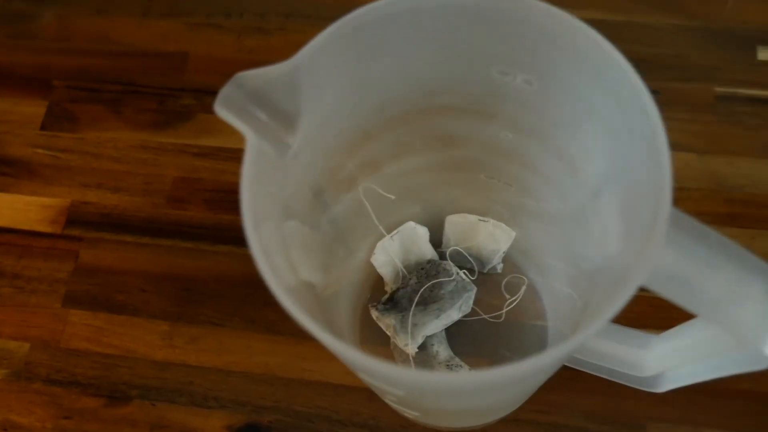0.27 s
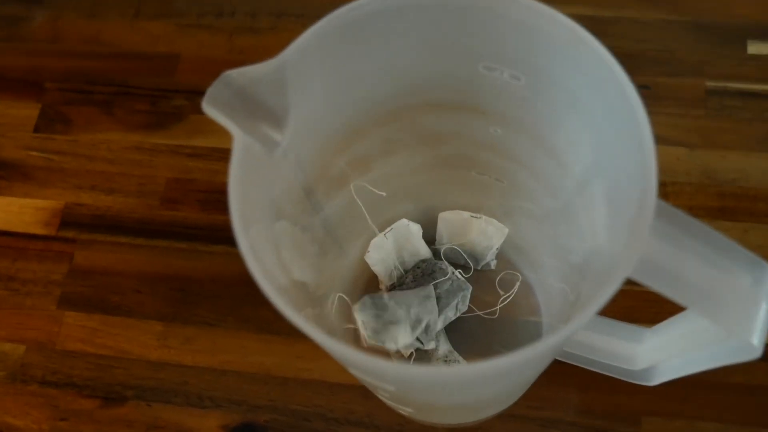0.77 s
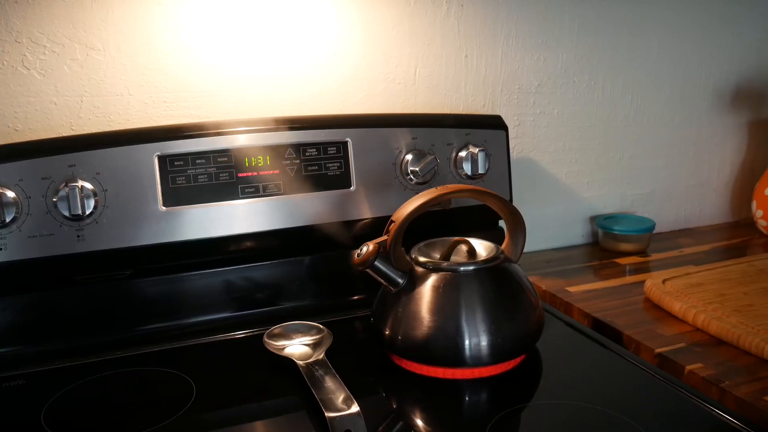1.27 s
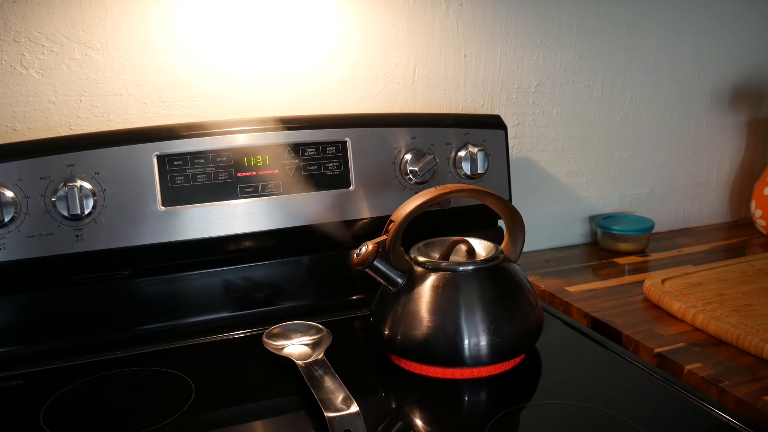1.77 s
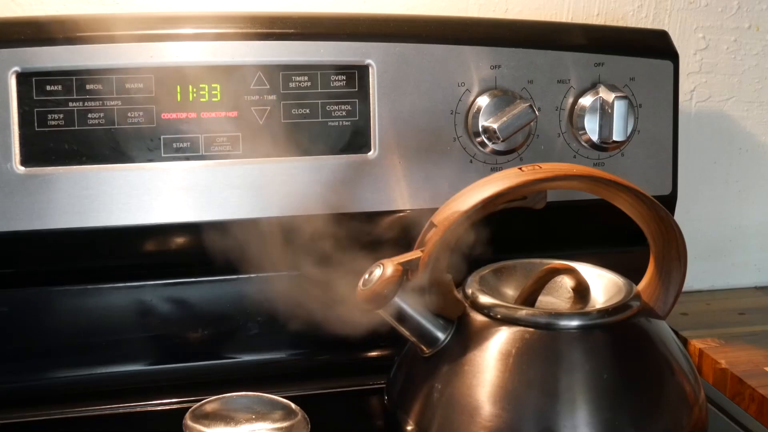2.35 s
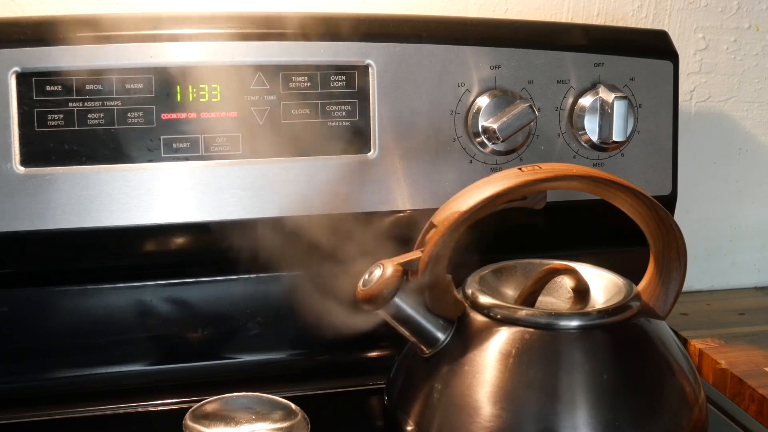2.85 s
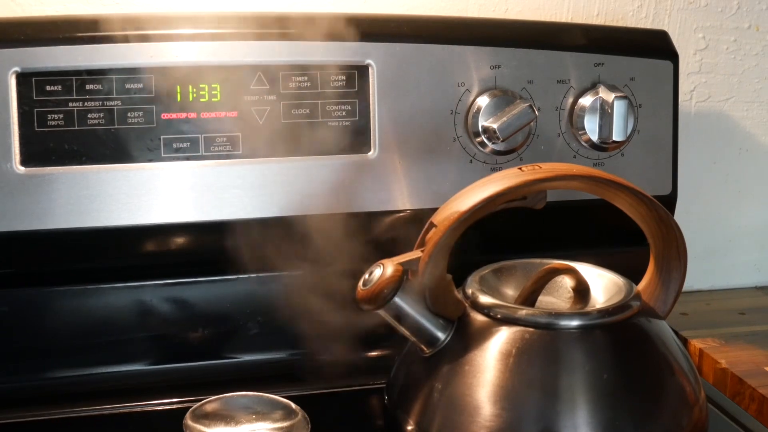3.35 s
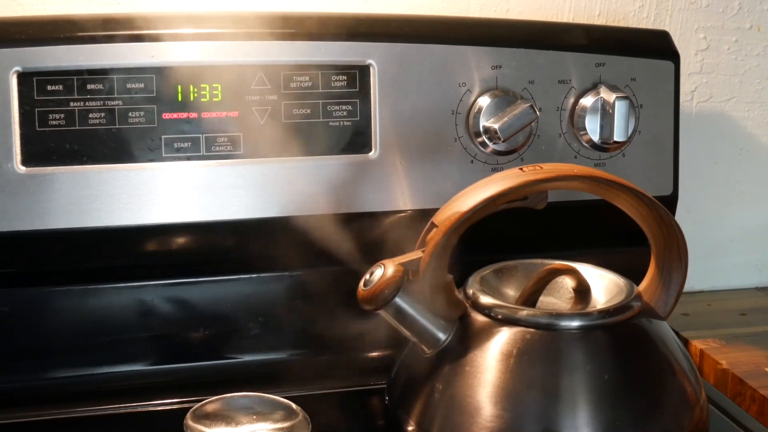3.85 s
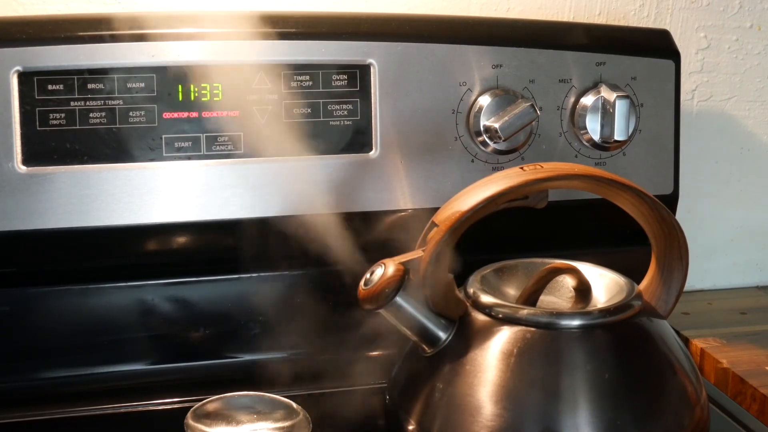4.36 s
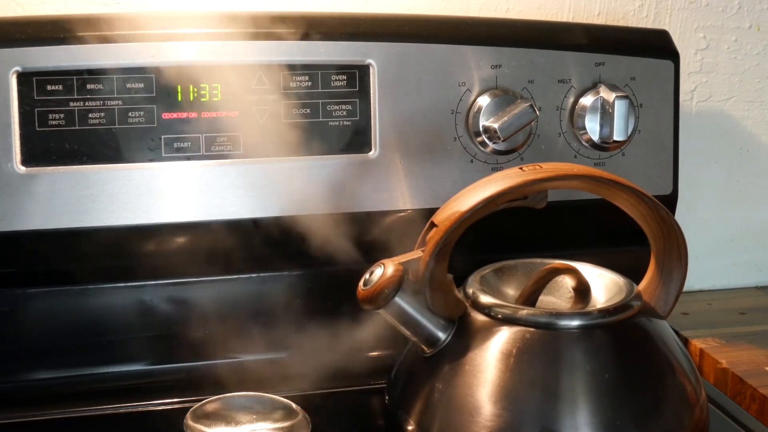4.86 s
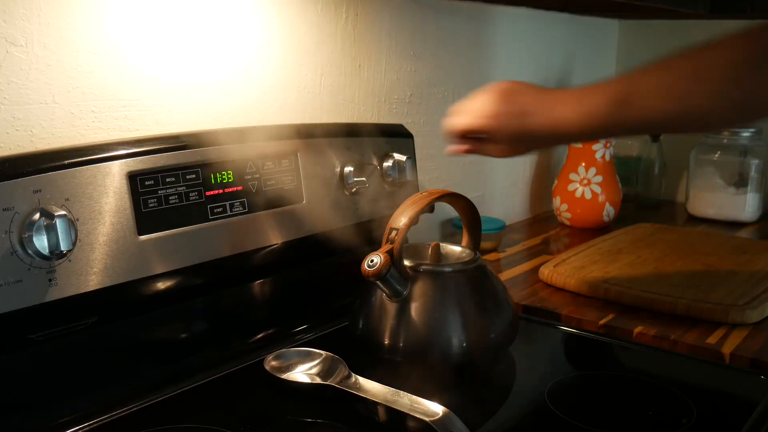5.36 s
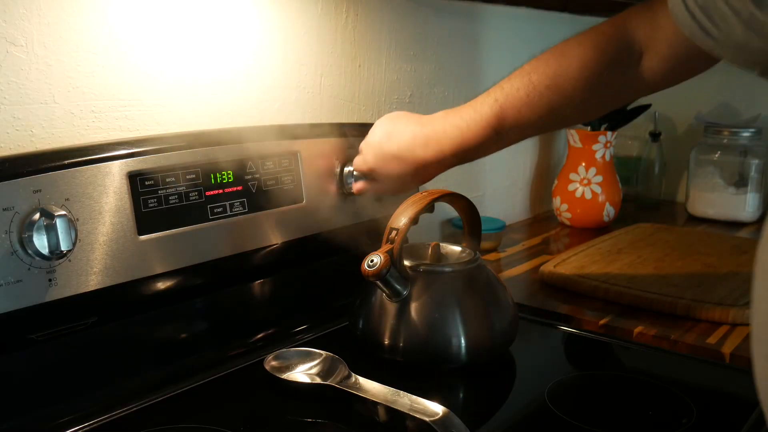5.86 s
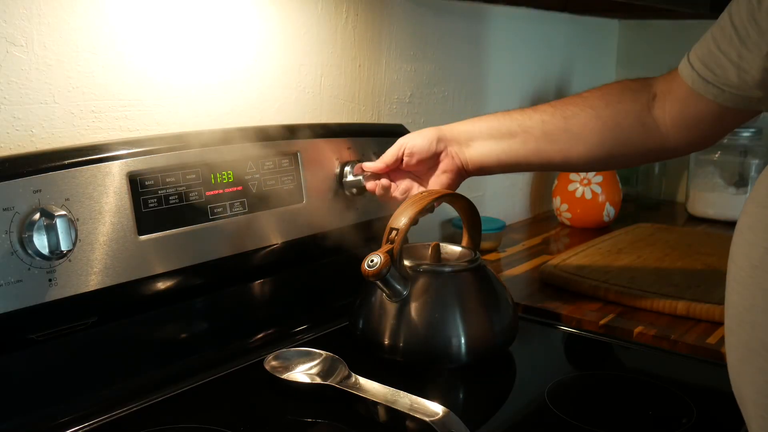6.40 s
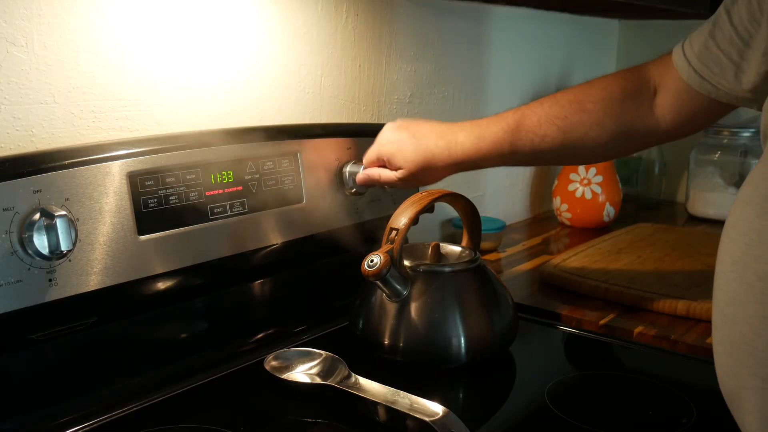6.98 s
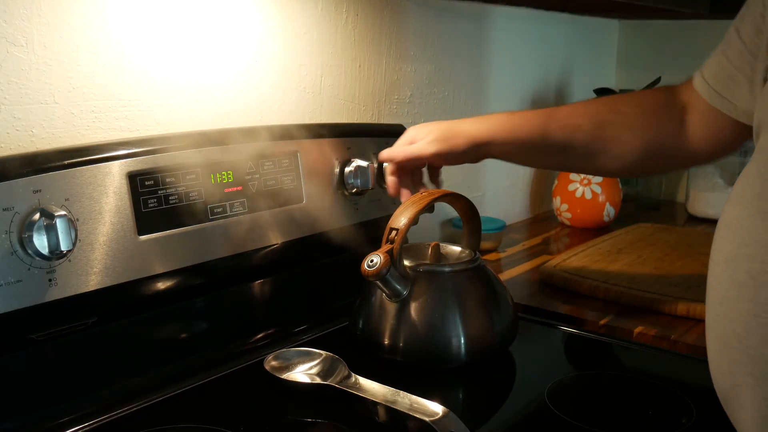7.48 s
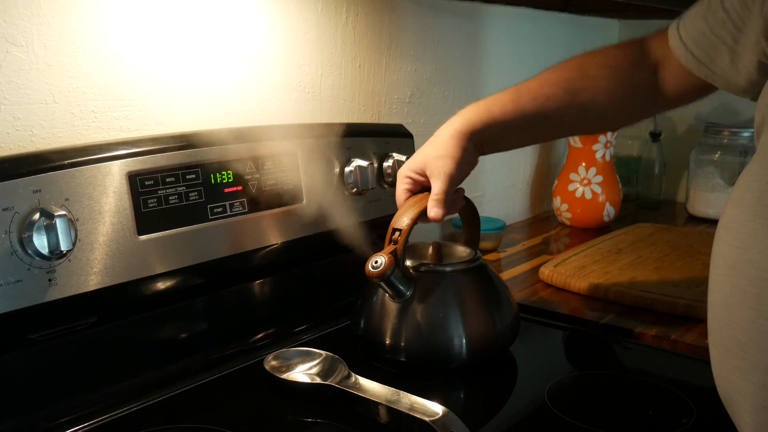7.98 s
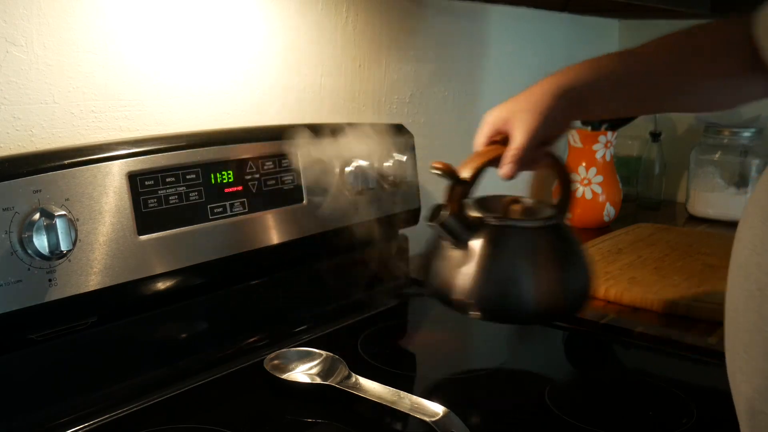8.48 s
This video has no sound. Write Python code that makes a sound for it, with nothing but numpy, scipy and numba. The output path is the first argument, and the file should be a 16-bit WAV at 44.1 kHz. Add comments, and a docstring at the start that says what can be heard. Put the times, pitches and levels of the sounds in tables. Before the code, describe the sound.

Soft sizzle and a tea bag's pat, brief silence, then a hoarse full-steam kettle whistle that drops lower and warbles, ending with knob clicks and a metallic cap snap.

```python
"""Whistling kettle

A tea bag pats into a plastic jug while a kettle heats; after a short silence the kettle whistles at full steam, hoarse,
then the scene skips ahead to a lower, warbling whistle. It is two unsteady spout tones of sines and resonant noise,
with hiss and squeaks; filtered noise gives the sizzle and boil, over a hum. The stove knob and switch click as
decaying modes; the whistle rises and dies as the spout cap is lifted, and the cap snaps open."""
import sys
import numpy as np
from scipy import signal
from scipy.fft import rfft, irfft, next_fast_len
from scipy.io import wavfile
from numba import njit

SR = 44100
rng = np.random.default_rng(int(sys.argv[2]) if len(sys.argv) > 2 else 0)


def persist_wave(psi):
    """Save psi, clipped to +-1, as 16-bit WAV."""
    counts = np.round(np.clip(psi, -1, 1) * 32767).astype(np.int16)
    wavfile.write(sys.argv[1], SR, np.atleast_2d(counts).T)


N = 385434
TIME = np.arange(N) / SR
SHORT = TIME[:SR // 2]  # time axis of brief sounds
HEAT_END_S, BOIL_START_S, SKIP_S, GRIP_S, CAP_LIFT_S = .897, 1.025, 2.392, 7.69, 8.045
OVERBLOWN_HZ = 5830  # the next spout resonance above the upper tone


# upper spout tone, which follows the steam pressure: (time [s], pitch [Hz])
FULL_STEAM_PITCH = [(1.03, 4830), (1.25, 5100), (1.55, 5292), (2.39, 5331)]
SLACK_STEAM_PITCH = [(2.392, 4510), (3.1, 4440), (4.33, 4453), (4.75, 4608), (5.049, 4750), (5.8, 4645),
                     (7.25, 4645), (7.689, 4720)]
# two swells as the kettle is gripped and tipped, then a drop as the cap opens: (time [s], pitch [Hz])
TIPPED_PITCH = [(7.72, 5080), (7.8, 4817), (7.865, 5410), (7.952, 5536), (8.005, 5493), (8.037, 4970)]
# lower tone and hiss: (time [s], relative level of the lower tone [dB], relative level of the hiss [dB])
STEAM_LEVELS = [(1.03, -27, -38), (1.75, -30, -37.3), (2.38, -28, -39.5), (2.4, -34.5, -39),
                (4.65, -35.5, -39.5), (5.0, -33, -37), (7.65, -31, -38.5), (7.92, -38.5, -37),
                (8.02, -32.5, -35.5)]
# turbulent hiss: (frequency [Hz], relative spectrum level [dB])
HISS_SPECTRUM = [(40, -45), (300, -10), (800, -12), (1200, -13), (1700, -13.5), (2100, -5.5), (3100, -6),
                 (4100, -16.5), (4700, 1), (6000, 2), (7100, -2), (7900, -10.5), (10500, -10), (15000, -29)]
# the upper tone cannot sink below the spout's own resonance: (frequency [Hz], relative gain [dB])
SPOUT_EDGE_GAIN = [(4000, -12), (4350, 2)]
# the upper tone stays faint until its pitch passes a threshold, then grows with it up to a ceiling
THRESHOLD_HZ, REST_DB, GROWTH_DB_PER_HZ, CEILING_DB = 4550, -35.2, .0217, -17.9
# the lower tone rests on its own note until the upper one pulls it along, about an octave below
LOW_REST_HZ, LOW_RATIO = 2479, .508


def whistle():
    """Jet lock-in to two spout tones; surges of boiling make both warble in pitch and throb in level."""
    high_hz, = curves(FULL_STEAM_PITCH + SLACK_STEAM_PITCH + TIPPED_PITCH)
    high_db = np.clip(REST_DB + GROWTH_DB_PER_HZ * (high_hz - THRESHOLD_HZ), REST_DB, CEILING_DB)
    low_hz = np.maximum(LOW_REST_HZ, LOW_RATIO * high_hz)
    low_db, hiss_db = curves(STEAM_LEVELS)
    surge = throb(hz=27.5, width_hz=32.3)
    flutter = throb(hz=71.8, width_hz=113)
    # a harder jet (drive 0 to 1) locks better and shakes faster
    drive = np.clip((high_db + 33) / 11, 0, 1)

    slow_shake = (.0135 - .0049 * drive) * surge
    fast_shake = (.0072 + .0093 * drive) * flutter
    jitter = (.011 + .003 * drive) * walk(520)
    upper_hz = high_hz * (1 + slow_shake + fast_shake + jitter)
    tone = unit(sine(upper_hz) * undb(1.06 * walk(260)))
    breath = undb(-6.5 - 5 * drive) * blown(upper_hz, width_hz=310)
    upper = unit(colour(tone + breath, SPOUT_EDGE_GAIN))
    octave = undb(-11.5 - 11 * drive) * blown((1.95 + .045 * drive) * upper_hz, width_hz=170)

    # each surge lifts the lower tone's pitch, and it sounds in short chirps
    warble_hz = low_hz * (1 + (.062 - .032 * drive) * surge + .02207 * walk(700))
    warble = np.sqrt(2) * sine(warble_hz) + undb(-3.5) * blown(warble_hz, width_hz=510)
    lower = unit(warble * undb(2.7 * throb(hz=29, width_hz=53)))
    third = undb(-11.5) * drive * blown(2.99 * low_hz, width_hz=610)
    # a hard jet also excites a resonance just above the lower tone
    rush = undb(-41) * drive * blown(1.168 * low_hz, width_hz=270)

    hiss = noise(HISS_SPECTRUM) * undb(1.1 * surge)
    # a slack jet keeps flicking up into the next resonance
    overblown = blown(OVERBLOWN_HZ * (1 + .0038 * flutter), width_hz=75)
    overblown = undb(-1) * overblown * undb(4.5 * surge) * (1 - drive)
    steam = (upper + octave) * undb(high_db)
    steam += (lower + third) * undb(low_db - .66) + rush
    steam += (hiss * undb(5.5) + overblown) * undb(hiss_db)
    return steam * fade_out(CAP_LIFT_S, length_s=.023)


# the slack jet jumps into a neighbouring resonance: (time [s], relative level [dB], pitch [Hz])
LOW_SQUEAKS = [(2.5596, -17.5, 2950), (2.7624, -23, 2766), (2.7935, -22, 2760), (2.829, -18.5, 2920),
               (3.2804, -26, 2760), (4.0836, -27, 2790), (4.5281, -21, 2900), (6.2322, -20, 2716)]
# the same in the spout's high resonance: (time [s], relative level [dB])
HIGH_SQUEAKS = [(4.0946, -21), (5.7664, -25), (5.8434, -23), (5.9203, -24), (6.1763, -22.5), (6.9107, -29),
                (7.235, -24)]


def squeaking():
    """Mode jumping: loud and faint squeaks in the resonances above each of the two tones."""
    low = [*LOW_SQUEAKS, *stray_squeaks(hz=2820, spread_hz=110, peak_db=-25.5)]
    high = [(s, db, OVERBLOWN_HZ) for s, db in HIGH_SQUEAKS]
    high += [*stray_squeaks(hz=OVERBLOWN_HZ, spread_hz=60, peak_db=-30)]
    return squeaks(low, length_s=.015, gain_db=-1) + squeaks(high, length_s=.022, gain_db=1.5)


def stray_squeaks(hz, spread_hz, peak_db):
    """Chance excitation: faint squeaks, loosely spaced over the slack whistle, as (s, dB, Hz)."""
    per_s, scatter_db = 2.6, 1.5
    chance = rng.standard_normal((64, 3))
    times = SKIP_S + (np.arange(len(chance)) + .5 + .27 * chance[:, 0]) / per_s
    levels_db = peak_db + scatter_db * chance[:, 1]
    rows = np.column_stack([times, levels_db, hz + spread_hz * chance[:, 2]])
    return rows[(times > SKIP_S) & (times < GRIP_S)]


def squeaks(table, length_s, gain_db):
    """Transient oscillation: short pure notes that swell, mostly sag in pitch, and stop."""
    out = np.zeros(N)
    age = np.minimum(SHORT / length_s, 1)
    swell = np.sin(np.pi * age ** .64)
    for (s, db, hz), bend in zip(table, rng.standard_normal(len(table))):
        note = sine(hz * (1 + .011 * (bend - .5) * (age - .5)))
        add(out, s - .003, undb(db + gain_db) * swell * note)
    return out


# the stove knob passes its detents:
# (time [s], relative level of the knob [dB], relative level of the switch behind it [dB])
KNOB_DETENTS = [(5.494, -33, -36), (5.523, -35, -30), (5.770, -26.5, -25.5), (6.543, -17.5, -17.5),
                (7.1232, -17, -3.5), (7.366, -30.5, -40)]
# modes of the hollow knob: (frequency [Hz], relative level [dB], 60 dB decay time [s])
KNOB_MODES = [(640, 0, 0.031), (750, -1, 0.056), (869, 3.5, 0.028)]
# modes of the switch and its steel panel: (frequency [Hz], relative level [dB], 60 dB decay time [s])
PANEL_MODES = [(297, -15.5, 0.14), (507, -9, 0.033), (1140, -8, 0.046), (1384, -10.5, 0.059),
               (1820, -0.5, 0.021), (1920, 0.5, 0.02), (2183, 2, 0.015), (2480, -8, 0.013),
               (3320, -23, 0.0062)]
# dense ring that lingers in that panel: (frequency [Hz], relative spectrum level [dB])
PANEL_RING = [(150, -18), (500, 2), (1900, 0), (4500, -24)]


def stove_knob():
    """Modal excitation: each detent strikes knob and panel, and rebounds once."""
    out = np.zeros(N)
    for s, knob_db, switch_db in KNOB_DETENTS:
        click = undb(knob_db) * strike(KNOB_MODES, crack_db=-7, crack_s=.055)
        click += undb(switch_db) * strike(PANEL_MODES, crack_db=-13, crack_s=.034)
        add(out, s, click)
        add(out, s, undb(switch_db - 27) * decay(.41) * noise(PANEL_RING, size=len(SHORT)))
        add(out, s + .0085, undb(-6.5) * click)
    return out


# modes of the spout cap: (frequency [Hz], relative level [dB], 60 dB decay time [s])
CAP_MODES = [(174, -25, .12), (317, -20, 0.092), (512, -17.5, 0.025), (1840, -6, 0.0057), (2460, -1, 0.009),
             (2900, -0.5, 0.0059), (3410, 2.5, 0.0084), (5700, -11, 0.0087), (6650, -15, .008)]
# the cap grazes, hits its stop and bounces: (time [s], relative level [dB])
CAP_BLOWS = [(8.1991, -22), (8.2015, -15.5), (8.2043, -0.5), (8.2060, -4), (8.215, -23)]
# dense ring of the kettle's steel shell: (frequency [Hz], relative spectrum level [dB])
SHELL_RING = [(60, -40), (500, -14), (1000, -10), (2500, -7), (3300, -5), (4300, -12), (5500, -2.5),
              (6700, -4), (8000, -7), (14000, -17)]


def spout_cap():
    """Impact and structure-borne sound: the hinge moves, the cap snaps open and the shell rings."""
    out = np.zeros(N)
    add(out, 8.155, undb(-38) * soft_blow(SHELL_RING, length_s=.045))
    for s, db in CAP_BLOWS:
        add(out, s, undb(db) * strike(CAP_MODES, crack_db=-5.5, crack_s=.015))
    # the shell takes the blow: a dense clank, then a lingering ring
    clank = undb(-19) * decay(.035) + undb(-28.5) * decay(.53)
    add(out, 8.204, clank * noise(SHELL_RING, size=len(SHORT)))
    return out


# tea bag landing in the jug: (frequency [Hz], relative spectrum level [dB])
TEA_BAG_PAT = [(120, -17), (260, -6), (330, 19.5), (450, -9), (1000, -11), (1900, -1.5), (3200, -10),
               (6000, -10), (14000, -19)]
# dull thud: (frequency [Hz], relative spectrum level [dB])
DULL_THUD = [(40, -18), (90, -6), (165, -4), (260, -19), (600, -30), (3000, -70)]


def handling():
    """Radiation efficiency: knob, cap, tea bag and one dull thud, all small and so without deep bass."""
    out = stove_knob() + spout_cap()
    add(out, .690, undb(-29.5) * soft_blow(TEA_BAG_PAT, length_s=.031))
    add(out, 4.545, undb(-32) * soft_blow(DULL_THUD, length_s=.075))
    return signal.sosfilt(signal.butter(3, 110, "high", fs=SR, output="sos"), out)


# contact noise of a hard blow: (frequency [Hz], relative spectrum level [dB])
CONTACT_CRACK = [(40, -28), (200, 4), (1000, -24), (3000, 10.5), (4500, -3), (8000, -2), (11000, -1.5),
                 (15000, -19)]


def strike(modes, crack_db, crack_s):
    """Modal superposition: decaying modes of alternating sign and a short crack of contact noise."""
    ring = np.zeros(len(SHORT))
    for k, (hz, db, t60_s) in enumerate(modes):
        ring += undb(db) * decay(t60_s) * np.sin(2 * np.pi * hz * SHORT) * (-1) ** k
    crack = undb(crack_db) * decay(crack_s) * noise(CONTACT_CRACK, size=len(SHORT))
    return ring / np.abs(ring).max() + crack


def soft_blow(points, length_s):
    """Extended contact time: a padded contact whose noise swells and fades."""
    return noise(points, size=len(SHORT)) * np.sin(np.pi * np.minimum(SHORT / length_s, 1))


# stereo width of the echo, set by hand, narrow around 7 kHz and wider above and below:
# (frequency [Hz], relative gain of the side signal [dB])
ECHO_WIDTH = [(60, -15), (1000, -0.5), (2700, -10), (4500, -16), (7000, -28), (9500, -10), (15000, -2)]


def kitchen(x, wet_db, t60_s):
    """Reverberation: direct sound plus a decaying noise tail, with separate decays for body and air."""
    tails = []
    for _ in range(2):
        chance = rng.standard_normal((2, len(SHORT)))
        body = colour(chance[0], [(5500, -.5), (11000, -10.5)]) * decay(t60_s)
        air = colour(chance[1], [(4000, -.5), (10000, 4.5)]) * decay(.15)
        tail = unit((body + air) * (SHORT > .002))
        tails.append(undb(wet_db) * tail / np.sqrt(len(SHORT)))
    mid = x + signal.fftconvolve(x, tails[0])[:N]
    side = signal.fftconvolve(x, colour(tails[1], ECHO_WIDTH))[:N]
    return np.array([mid + side, mid - side]) / np.sqrt(1 + undb(wet_db) ** 2)


# sizzle of heating water: (frequency [Hz], relative spectrum level [dB])
HEATING_SPECTRUM = [(30, -18), (75, -7.5), (220, -5.5), (370, -5), (620, -12.5), (1600, -18), (4500, -13),
                    (7400, -10.5), (7850, -15.5), (8600, -7.5), (10500, -8.5), (15000, -21)]
# rumble of the boil: (frequency [Hz], relative spectrum level [dB])
BOIL_SPECTRUM = [(25, -39), (50, -17), (90, 0), (150, -2), (300, -2.5), (500, -5), (900, -14),
                 (1800, -17.5), (5000, -20), (7000, -16), (8000, -22.5), (10300, -19), (15000, -31)]
# hum lines: (frequency [Hz], relative level while heating [dB], relative level at the boil [dB])
HUM_LINES = [(116.6, -59.5, -53.5), (212.9, -47, -54.5), (236.4, -59, -57), (357.7, -52.5, -58.5)]


def background():
    """Broadband and tonal noise: sizzle of heating water, later the rumble of the boil, both with a hum."""
    heating = undb(-37.5) * wide_noise(HEATING_SPECTRUM)
    boiling = undb(-43) * wide_noise(BOIL_SPECTRUM)
    for hz, heating_db, boiling_db in HUM_LINES:
        line = np.sqrt(2) * sine(hz * (1 + .00605 * walk(14))) * undb(2 * walk(8))
        heating = heating + undb(heating_db) * line
        boiling = boiling + undb(boiling_db) * line
    return np.where(TIME < BOIL_START_S, heating, boiling)


# stereo width chosen for the background noise, narrowest near 6.5 kHz:
# (frequency [Hz], relative gain of the side signal [dB])
BACKGROUND_WIDTH = [(25, 0), (70, -8), (1000, -8), (4000, -10), (6500, -18), (10000, -7)]


def wide_noise(points):
    """Partial decorrelation: stereo noise from independent mid and side, with a gently wandering level."""
    mid, side = noise(points), colour(noise(points), BACKGROUND_WIDTH)
    return np.array([mid + side, mid - side]) * undb(.83 * walk(10))


def throb(hz, width_hz):
    """Narrow-band noise: a nearly regular wobble of rms 1."""
    return blown(np.full(N, float(hz)), width_hz)


def blown(hz, width_hz):
    """Resonant filtering: turbulence caught in two cascaded band-passes, rms 1."""
    once = resonate(rng.standard_normal(N), hz, float(width_hz))
    return unit(resonate(once, hz, float(width_hz)))


@njit
def resonate(x, hz, width):
    """State-variable resonance: a band-pass with a moving centre [Hz]."""
    y, band, low = np.empty(len(x)), 0., 0.
    for i in range(len(x)):
        g, k = np.tan(np.pi * hz[i] / SR), width / hz[i]
        v = (band + g * (x[i] - low)) / (1 + g * (g + k))
        band, low, y[i] = 2 * v - band, low + 2 * g * v, k * v
    return y


def sine(hz):
    """Frequency modulation: the phase is the running sum of the pitch."""
    return np.sin(2 * np.pi * np.cumsum(hz) / SR)


def decay(t60_s):
    """Exponential decay: gain that falls 60 dB in t60_s."""
    return undb(-60 * SHORT / t60_s)


def noise(points, size=N):
    """Spectral shaping: coloured noise of rms 1."""
    return unit(colour(rng.standard_normal(next_fast_len(size, True)), points)[:size])


def colour(x, points):
    """Linear filtering by (Hz, dB) points, interpolated over log frequency."""
    hz, db = np.transpose(points)
    f = np.maximum(np.fft.rfftfreq(len(x), 1 / SR), 1)
    return irfft(rfft(x) * undb(np.interp(np.log(f), np.log(hz), db)), len(x))


def walk(rate):
    """Random modulation: straight lines between rate chance values a second, rms 1."""
    knots = rng.standard_normal(N // 8)
    return unit(np.interp(TIME * rate, np.arange(len(knots)), knots))


def curves(table):
    """Linear interpolation: each column of a table, sample by sample."""
    s, *columns = np.transpose(table)
    return [np.interp(TIME, s, c) for c in columns]


def fade_out(end_s, length_s):
    """Linear envelope: gain that ramps from 1 to 0, centred on end_s."""
    return np.clip((end_s - TIME) / length_s + .5, 0, 1)


def add(track, s, sound):
    """Superposition: mix a sound in at a time [s]."""
    i = int(s * SR)
    track[i:i + len(sound)] += sound[:N - i]


def undb(db):
    """Level to amplitude ratio: decibels to gain."""
    return 10 ** (np.asarray(db) / 20)


def unit(x):
    """Normalisation: scale to rms 1."""
    return x / np.sqrt(np.mean(x ** 2))


def scene():
    """Superposition in a room: kettle and hands in the kitchen, a touch to the left."""
    steam = whistle() + squeaking()
    boiling = TIME > BOIL_START_S
    full = TIME < SKIP_S  # the scene skips ahead here, cutting off whistle and echo
    kettle = kitchen(steam * full, wet_db=.5, t60_s=.28) * full
    kettle += kitchen(steam * ~full, wet_db=-2, t60_s=.34)
    hands = kitchen(handling(), wet_db=-6.5, t60_s=.46)
    # silence between heating and boiling
    heard = fade_out(HEAT_END_S, length_s=.018) + boiling
    left_right_db = np.array([[.2], [-.2]])
    return (kettle * boiling + hands + background()) * heard * undb(left_right_db)


def record(dry):
    """Hard clipping and band limiting: peaks are cut at 0.8, then the treble above 15.3 kHz."""
    low_pass = signal.ellip(10, .2, 80, 15300, fs=SR, output="sos")
    return signal.sosfilt(low_pass, np.clip(dry, -.8, .8))


dry = scene()
out = record(dry)
persist_wave(out)
```